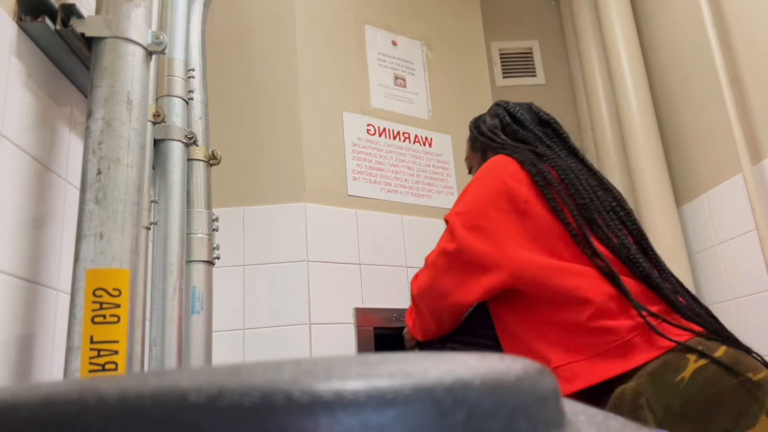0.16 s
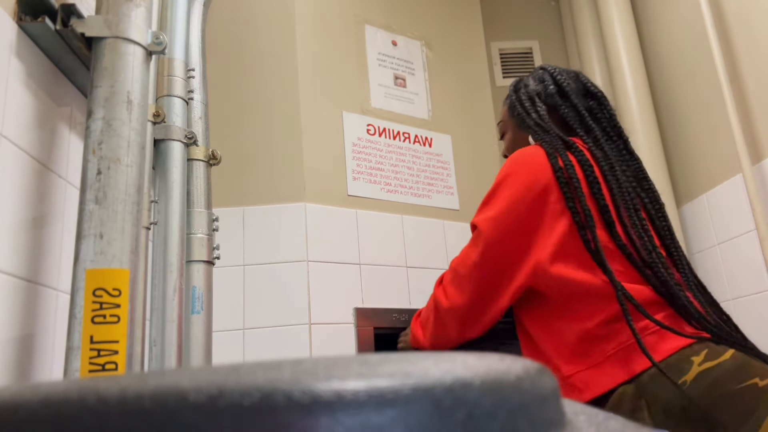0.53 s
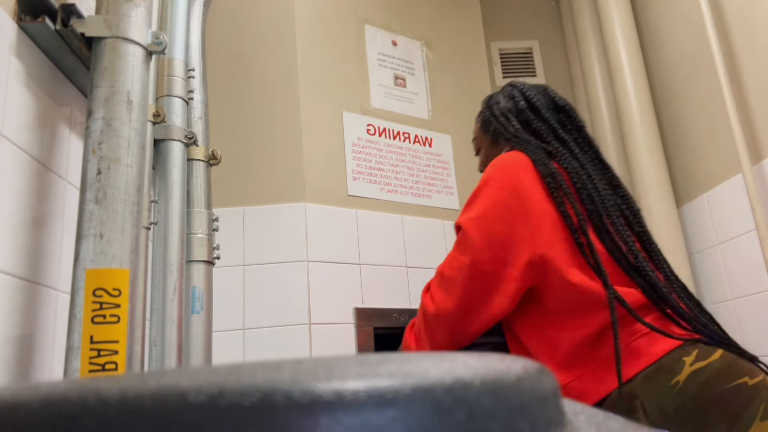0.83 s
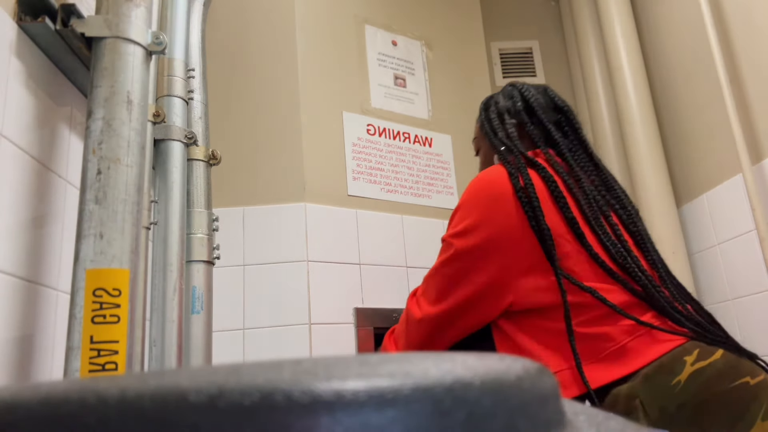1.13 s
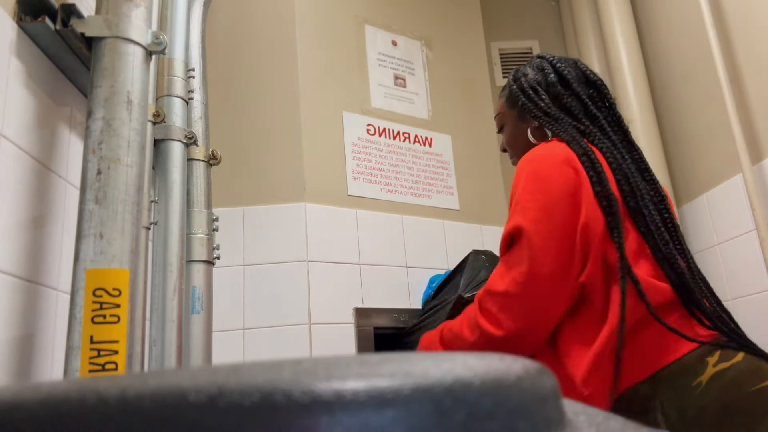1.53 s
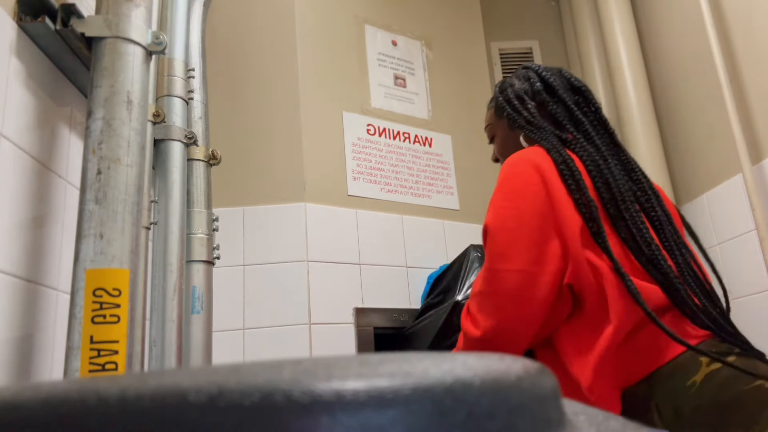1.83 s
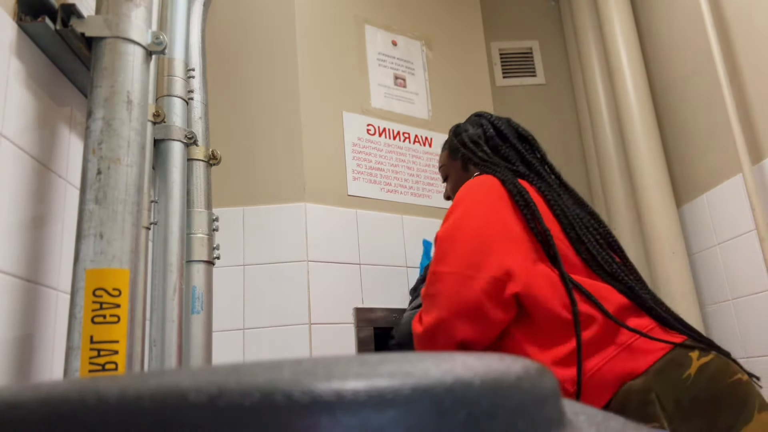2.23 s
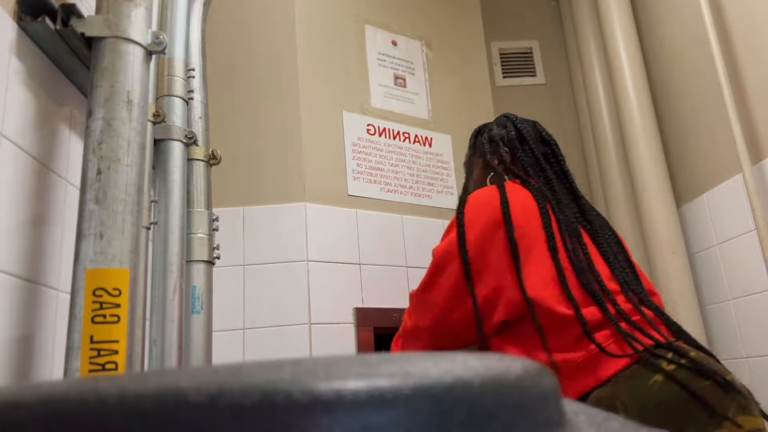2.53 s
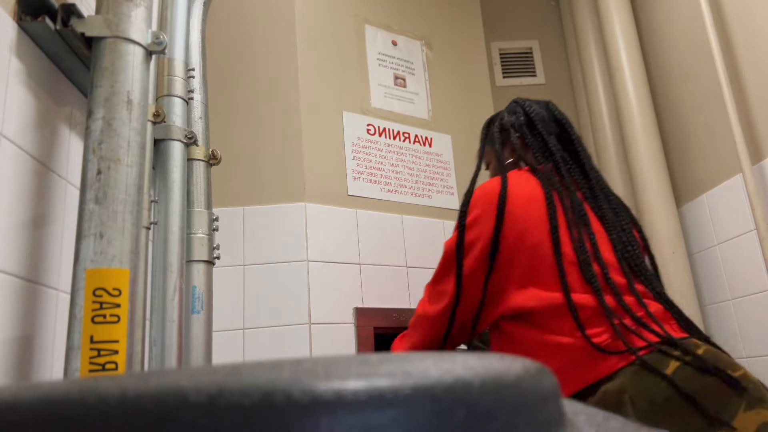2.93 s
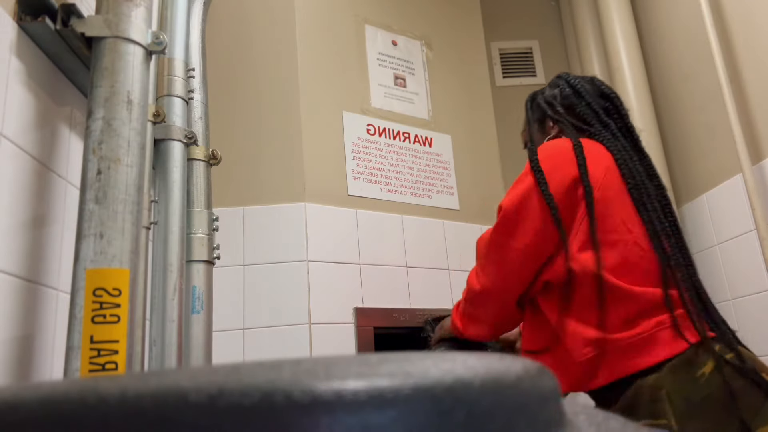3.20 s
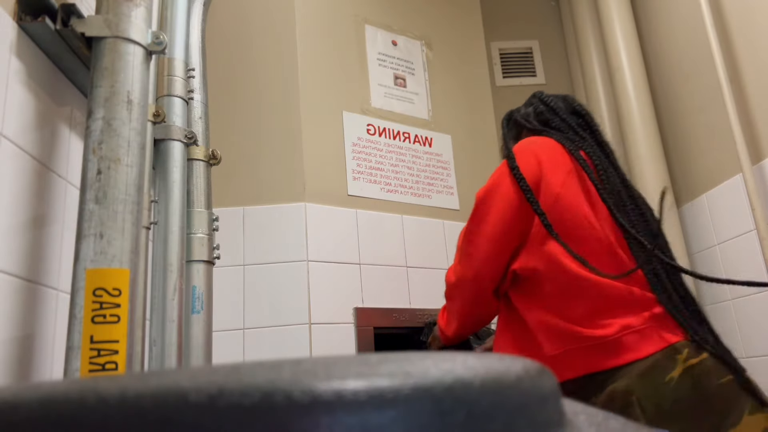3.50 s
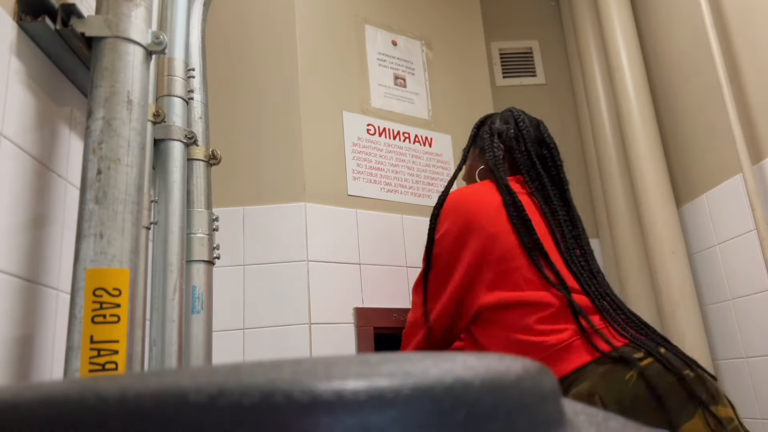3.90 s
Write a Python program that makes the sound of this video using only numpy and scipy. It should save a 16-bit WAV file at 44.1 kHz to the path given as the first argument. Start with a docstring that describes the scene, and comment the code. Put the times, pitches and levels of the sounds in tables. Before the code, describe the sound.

Full plastic rubbish bags crackle, scrape and thump as they are shoved in bursts through a steel chute hopper in a small tiled room.

```python
"""Rubbish bags in a chute hopper

Full plastic bags are shoved through the steel hopper of a rubbish chute in a small tiled room.
Film crackles and snaps as random pops ring at fold pitches; the slide over the lip is dense coloured slips.
The hopper is a bank of resonators, rubbed by noise and struck by the knocks of hard things in the bags.
A faint steady draught, close walls and a dull reverberant tail complete the stereo scene."""
import sys
import numpy as np
from scipy import signal
from scipy.fft import rfft, irfft, next_fast_len
from scipy.io import wavfile

SR = 44100
rng = np.random.default_rng(int(sys.argv[2]) if len(sys.argv) > 2 else 0)


def wav_record(signal):
    """Record a signal, one row per channel, as 16-bit PCM in the file named by sys.argv[1]."""
    frames = np.transpose(np.atleast_2d(signal))
    bounded = np.clip(frames, -1, 1)
    # unit amplitude maps onto the largest positive 16-bit level
    quanta = np.round(bounded * 32767).astype(np.int16)
    wavfile.write(sys.argv[1], SR, quanta)


N = 178683

# Spectrum of the crackling film, also lent to the draught.
# Each row: frequency in Hz, relative density in dB per Hz.
FILM_SPECTRUM = [(400, -2), (900, -7.5), (1600, -3), (2600, -2), (3600, -12.5), (5000, -13), (6500, -16.5),
                 (8500, -21.5), (11000, -23), (15500, -30)]


def from_db(db):
    """Amplitude gain is the antilogarithm of a twentieth of the decibels."""
    return 10 ** (np.asarray(db) / 20)


def rms_one(x):
    """Normalisation to unit root-mean-square makes every source's level depend on its gain alone."""
    return x / np.sqrt(np.mean(x ** 2) + 1e-20)


def in_time(tables):
    """Linear interpolation joins successive tables into one level curve per column."""
    seconds, *columns = np.transpose(np.concatenate(tables))
    return [np.interp(np.arange(N) / SR, seconds, column) for column in columns]


def at_hz(points, hz, axis=1):
    """A spectrum column is interpolated on a logarithmic frequency axis, as pitch is heard."""
    points = np.array(points)
    return np.interp(np.log(hz + 1), np.log(points[:, 0]), points[:, axis])


def drift(rate_hz):
    """Slow chance: noise through two equal one-pole low-passes, with spread 1."""
    pole = np.exp(-2 * np.pi * rate_hz / SR)
    noise = rng.standard_normal(N + SR)  # the first second runs the filter in
    return rms_one(signal.lfilter([1], [1, -2 * pole, pole * pole], noise)[SR:])


def coloured(x, spectrum):
    """Spectral shaping: multiplication in frequency colours a dense signal, returned at rms 1."""
    size = next_fast_len(N)
    gain = from_db(at_hz(spectrum, np.fft.rfftfreq(size, 1 / SR)))
    return rms_one(irfft(rfft(x, size) * gain, size)[:N])


def grains(per_s, spread_db):
    """Random impulses at a mean rate: exponential decibel sizes give many small and a few large."""
    sizes = from_db(spread_db * np.minimum(rng.exponential(1, N), 4))
    signs = rng.choice([-1, 1], N)
    return sizes * signs * (rng.random(N) < per_s / SR)


def ring(force, hz, t60):
    """Damped resonator: a unit impulse starts a decaying sine of initial height 1."""
    radius, angle = from_db(-60 / (t60 * SR)), 2 * np.pi * hz / SR
    return signal.lfilter([0, np.sin(angle)], [1, -2 * radius * np.cos(angle), radius ** 2], force + 1e-18)


def follows(leader_db, under_db, steepness):
    """Level-dependent spectrum: one level follows another, lying under_db from it at full force."""
    full_force_db = -20
    return full_force_db + under_db + steepness * (leader_db - full_force_db)


def film(crackle_db, sizzle_db):
    """Buckling of thin film: folds pop in clumps and ring briefly, while the finest folds sizzle."""
    pops = grains(4000 * from_db(2.7 * drift(40)), spread_db=2.5)
    pitches = np.geomspace(700, 5000, num=14)
    fold = rng.integers(0, len(pitches), N)  # each pop belongs to one fold pitch
    crackle = np.zeros(N)
    for k, hz in enumerate(pitches):
        rung = rms_one(ring(pops * (fold == k), hz, t60=8.8 / hz))
        # groups of folds come and go; the root of Hz turns density into band level
        crackle += from_db(at_hz(FILM_SPECTRUM, hz) + 1.0 * drift(28)) * np.sqrt(hz) * rung
    fine = coloured(pops + grains(14000, spread_db=1.0), FILM_SPECTRUM)
    sizzle = signal.sosfilt(signal.butter(2, 4500, "high", fs=SR, output="sos"), fine)
    return from_db(crackle_db) * rms_one(crackle) + from_db(sizzle_db) * rms_one(sizzle)


def slide(slide_db):
    """Stick-slip friction: the bag drags over the steel lip in dense uneven slips."""
    # Each row: frequency in Hz, relative density in dB per Hz.
    slide_spectrum = [(150, -5), (300, -4), (500, 3), (900, 3), (1400, 2), (2200, -6), (4000, -27)]
    slips = grains(1500 * from_db(3.0 * drift(25)), spread_db=1.5)
    return from_db(slide_db + 3.13 * drift(4.8)) * coloured(slips, slide_spectrum)


def drumming(rumble_db):
    """Band-limited random impact: tumbling contents make a broad, rough rumble without pitch."""
    tumble_db = -8  # relative to the rumble curve
    thuds = grains(400 * from_db(2.8 * drift(18)), spread_db=2.5)
    low = signal.sosfilt(signal.butter(2, [130, 450], "band", fs=SR, output="sos"), thuds)
    return from_db(rumble_db + tumble_db) * rms_one(low)


def draught():
    """Stationary turbulence: shaped noise at one level stands for the draught up the chute."""
    air_db = -43
    return from_db(air_db) * coloured(rng.standard_normal(N), FILM_SPECTRUM)


def hopper(knocks, rumble_db, thrum_db):
    """Modal superposition: the load rubs all modes with noise; knocks excite most those near their pitch."""
    # Modes of the hopper and chute mouth.
    # Each row: frequency in Hz, relative level in dB, decay time t60 in seconds.
    modes = [(58, -6.5, 0.4), (87, 0.5, 0.37), (142.6, -14, 0.77), (165.3, -11.5, 0.28),
             (211.4, -9.5, 0.41), (268.8, -10.5, 0.27), (292, -10, 0.36), (360, -9.5, 0.41),
             (409.6, -8, 0.13), (537, -18, 0.93), (599.7, -13, 0.27), (697, -17.5, 0.097),
             (796, -18.5, 0.072), (867, -19.5, 0.25), (1003, -17, 0.11), (1047, -24, 0.31),
             (1650, -26, 0.089)]
    coupling_db = -50  # share of the knocks passed into the steel
    out = np.zeros(N)
    for hz, level_db, t60 in modes:
        rubbed = rms_one(ring(rng.standard_normal(N), hz, t60))
        struck = ring(from_db(coupling_db) * knocks, hz, t60)
        rub_db = thrum_db if hz < 115 else rumble_db  # the deepest modes thrum
        out += from_db(level_db) * (from_db(rub_db) * rubbed + struck)
    return out


def snaps():
    """Sudden release of tension: a bright crack and a burst of pops, resonant at the film patch's pitch."""
    # Film pulled taut or slapped.
    # Each row: start in seconds, burst level in dB, centre frequency in Hz, crack level in dB.
    snap_events = [(.066, -26.5, 2340, -21.5), (0.103, -20.5, 1650, -32), (.25, -25.5, 1300, -56),
                   (.292, -29, 1850, -63), (0.795, -32.5, 1630, -40), (0.872, -29, 4900, -19),
                   (0.879, -19.5, 1730, -25.5), (0.897, -32, 2100, -31), (1.004, -26, 1500, -43),
                   (1.22, -32.5, 2500, -48), (1.54, -35, 1610, -67), (1.674, -28.5, 2770, -38),
                   (1.899, -35, 1620, -51), (1.942, -31, 1500, -58), (2.045, -23, 1650, -48),
                   (2.066, -19, 3240, -39), (2.091, -24, 1650, -47), (2.122, -16, 2840, -21.5),
                   (2.184, -28, 2820, -51), (2.33, -34, 2600, -46), (2.515, -29.5, 2450, -30.5),
                   (2.632, -33, 3200, -55), (2.706, -27, 3570, -49), (2.782, -26, 4050, -53),
                   (2.985, -41, 1820, -34), (3.12, -29, 1630, -36), (3.276, -30.5, 2540, -64),
                   (3.33, -35.5, 2940, -45), (3.379, -36, 1800, -39), (3.611, -23.5, 1960, -45),
                   (3.656, -20, 1530, -24.5), (3.75, -25, 1920, -47), (3.997, -30.5, 1480, -62)]
    burst_t60, crack_t60 = 0.2, 0.11  # seconds
    out, t = np.zeros(N + SR), np.arange(SR // 2) / SR
    pops = coloured(grains(9000, spread_db=5.0), FILM_SPECTRUM)
    bright = rms_one(signal.sosfilt(signal.butter(2, 4000, "high", fs=SR, output="sos"), pops))
    for start, burst_db, hz, crack_db in snap_events:
        at = int(start * SR)
        local = np.resize(pops[at:], len(t))
        patch = rms_one(signal.lfilter(*signal.iirpeak(hz, 2.5, fs=SR), local))
        burst = (0.51 * local + 0.83 * patch) * from_db(burst_db - 60 * t / burst_t60)
        crack = np.resize(bright[at:], len(t)) * from_db(crack_db - 60 * t / crack_t60)
        out[at:at + len(t)] += burst + crack
    return out[:N]


def bumps():
    """Contact mechanics: each knock is a short tone lasting as long as the contact, longer when low."""
    # Contents on steel.
    # Each row: start in seconds, relative level in dB, pitch of the bump in Hz.
    knock_events = [(.075, -19, 336), (.11, -15, 360), (.112, -3, 1650), (.12, -25.5, 87),
                    (.175, -13.5, 147), (.443, -35.5, 85), (.593, -27, 353), (.84, -23.5, 155),
                    (.935, -16.5, 152), (.905, -24, 87), (1.002, -11.5, 168.5), (1.02, -36, 310),
                    (1.254, -13.5, 686), (1.272, -10, 597), (1.323, -18, 182), (1.673, -12, 630),
                    (1.715, -8.5, 325.5), (1.77, -23.5, 60), (2.08, -9, 384), (2.137, -7.5, 337),
                    (2.231, -21.5, 87), (2.235, -11, 146), (2.515, -12.5, 156), (2.6, -21, 87),
                    (2.69, -7.5, 662), (2.698, -17, 470), (2.71, -10.5, 196), (2.722, -9.5, 597),
                    (3.118, -12.5, 610), (3.158, -25, 298), (3.377, -26, 285), (3.527, -15, 700),
                    (3.543, -12.5, 793), (3.655, -17, 84), (3.665, -6, 233), (3.69, -12, 224),
                    (3.745, -3.5, 292), (3.772, -18.5, 91), (3.778, -1.5, 300), (3.81, -20, 268),
                    (3.86, -9, 308)]
    contact_s, middle_hz, shortens = 0.023, 300, 0.34  # contact at the middle pitch; exponent with pitch
    out = np.zeros(N)
    for start, level_db, hz in knock_events:
        duration = contact_s * (middle_hz / hz) ** shortens
        t = np.arange(int(duration * SR)) / SR
        swell = np.sin(np.pi * np.sqrt(t / t[-1]))  # quick rise, slower fall
        out[int(start * SR):][:len(t)] += from_db(level_db) * swell * np.sin(2 * np.pi * hz * t)
    return out


def near_walls(x):
    """All-pass reflection: bounces between close surfaces scramble the phase and leave the colour."""
    for lag_s in (0.003, 0.021, 0.0087):
        taps = np.r_[.55, np.zeros(int(lag_s * SR)), 1]
        x = signal.lfilter(taps, taps[::-1], x)
    return x


def scattered(x, t60, gap_s):
    """Diffuse reverberation: as the bag keeps moving, the sound crossfades through six noise-like paths."""
    path_change_s = .08
    t, turn = np.arange(int(t60 * SR)) / SR, np.arange(N) / SR / path_change_s
    paths = rng.standard_normal((6, len(t))) * from_db(-60 * t / t60) * (t >= gap_s)
    paths /= np.sqrt(np.sum(paths ** 2, axis=1, keepdims=True))
    distance = np.abs((turn - np.arange(6)[:, None] + 3) % 6 - 3)  # from each path's turn, cyclic
    shares = np.clip(1 - distance, 0, 1) ** .5  # equal-power crossfade
    return signal.fftconvolve(x * shares, paths, axes=1)[:, :N].sum(axis=0)


def room(x):
    """Frequency-dependent absorption: the tail off the tiles is duller than the direct sound."""
    tail_db, wall_cut_hz = -5, 3900
    dull = signal.sosfilt(signal.butter(1, wall_cut_hz, fs=SR, output="sos"), x)
    return from_db(tail_db) * scattered(dull, t60=0.31, gap_s=0.0036)


def stereo(front, around):
    """Interchannel coherence: mid and side share each frequency; side that follows mid leans the image."""
    # The channels are opposite in phase near 8 kHz and alike above 12 kHz.
    # Each row: frequency in Hz, side over mid in dB, lean to the left from -1 to 1.
    image = [(60, -80, 0), (200, -29, .2), (366, -14.5, 0.15), (700, -7.5, 0.14), (1300, -10.5, 0.64),
             (2600, -2, -0.18), (4350, -3.5, -0.29), (6773, 2, -0.25), (7780, 62, 0.039), (9200, 49, 0.33),
             (9770, 3.5, 0), (11740, -7.5, -0.32), (12000, -23, 0), (16000, -17, 0)]
    size = next_fast_len(N + 4096)
    hz = np.fft.rfftfreq(size, 1 / SR)
    angle = np.arctan(from_db(at_hz(image, hz)))
    lean = np.clip(at_hz(image, hz, axis=2), -1, 1)
    front, around = rfft(front, size), rfft(around, size)
    mid = irfft(np.cos(angle) * front, size)[:N]
    side = irfft(np.sin(angle) * (lean * front + np.sqrt(1 - lean ** 2) * around), size)[:N]
    return np.array([mid + side, mid - side])


def scene():
    """Superposition: direct sources, ringing steel and reflections add, near walls returning from the sides."""
    # Levels of the shoving, with sudden steps at 0.87, 1.67, 2.51 and 3.28 s.
    # Each row: time in seconds, then levels in dB of film crackle, slide over the lip, hopper rumble.
    shoving = [
        [(0.0, -35.5, -27.5, -26.5), (.116, -15.5, -26, -25.5), (.25, -40, -35.5, -29),
         (.37, -55, -35.5, -40.5), (.47, -37, -35.5, -35.5), (.62, -35, -38.5, -33), (.72, -52, -45, -42),
         (.866, -35.5, -30.5, -31)],
        [(.872, -17, -32, -26), (.976, -28, -27.5, -27.5), (1.024, -27.5, -23.5, -16.5),
         (1.09, -37.5, -30.5, -30), (1.15, -44, -36.5, -29.5), (1.274, -33, -33.5, -30.5),
         (1.374, -39, -29, -30.5), (1.5, -54, -44.5, -39), (1.556, -51, -29.5, -36.5),
         (1.665, -42, -41.5, -35.5)],
        [(1.673, -35, -32, -34), (1.73, -37, -30, -26), (1.8, -38, -35.5, -35), (2.025, -29.5, -26.5, -27),
         (2.09, -21, -18.5, -18.5), (2.149, -26.5, -26, -17.5), (2.207, -32, -23.5, -34),
         (2.247, -31, -23, -25.5), (2.389, -34.5, -30, -32), (2.44, -42.5, -38, -34), (2.51, -41, -34, -39)],
        [(2.515, -33, -22, -25), (2.631, -26.5, -25.5, -21.5), (2.701, -32.5, -23, -20.5),
         (2.86, -28.5, -27, -31), (2.95, -44, -33.5, -34.5), (3.025, -37, -28.5, -34.5),
         (3.129, -34.5, -33.5, -32), (3.27, -45.5, -38, -41.5)],
        [(3.292, -48, -33.5, -57.5), (3.39, -36.5, -46, -37.5), (3.484, -42, -39.5, -39),
         (3.538, -35, -32.5, -35.5), (3.685, -18.5, -16, -19.5), (3.725, -23, -16.5, -20.5),
         (3.79, -23.5, -18, -14), (3.85, -27, -24, -23.5), (3.97, -36, -33.5, -30), (4.05, -32.5, -29, -35.5)],
    ]
    crackle_db, slide_db, rumble_db = in_time(shoving)
    sizzle_db = follows(crackle_db, under_db=-11, steepness=0.79)
    thrum_db = follows(rumble_db, under_db=-17.5, steepness=0.74)
    knocks = bumps()
    direct_db = -7  # share of the knocks heard directly
    bag = film(crackle_db, sizzle_db) + snaps() + slide(slide_db) + drumming(rumble_db)
    bag += from_db(direct_db) * knocks + draught()
    steel = hopper(knocks, rumble_db, thrum_db)
    # the hopper's modes already hold most of its ring, so the room gets little steel
    front = bag + steel + room(bag + 0.24 * steel)
    around = near_walls(bag + steel) + room(bag + .3 * steel)
    return stereo(front, around)


def record(dry):
    """Band limiting and saturation: the microphone drops deep bass, peaks are rounded, the top is cut."""
    low_cut_hz, cutoff_hz = 45.5, 16250
    thin = signal.sosfilt(signal.butter(4, low_cut_hz, "high", fs=SR, output="sos"), dry)
    rounded = 1.068 * np.tanh(thin)
    return signal.sosfilt(signal.cheby2(16, 70, cutoff_hz, fs=SR, output="sos"), rounded)


dry = scene()
out = record(dry)
wav_record(out)
```